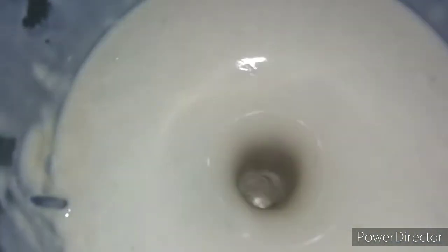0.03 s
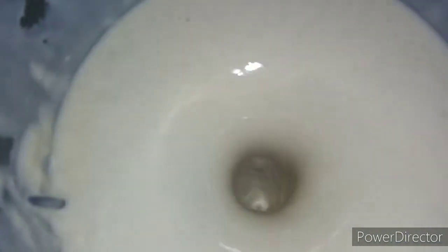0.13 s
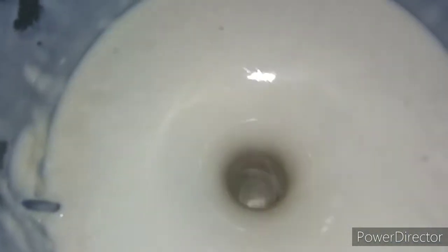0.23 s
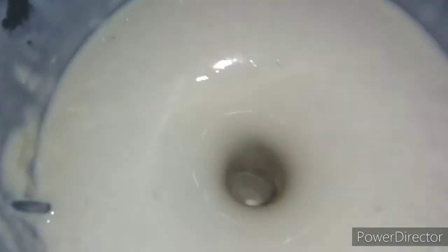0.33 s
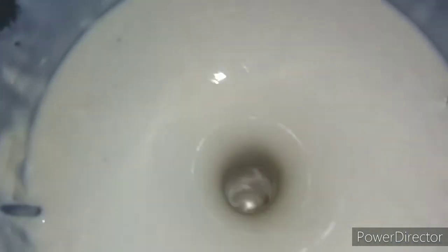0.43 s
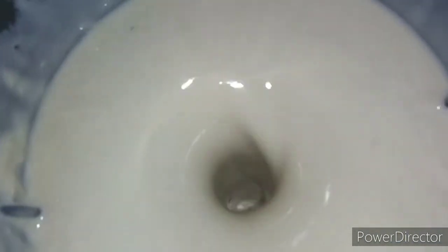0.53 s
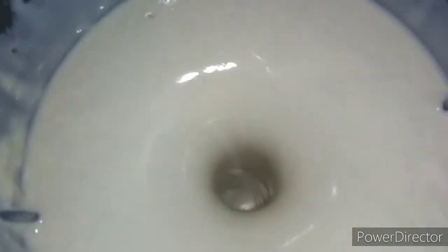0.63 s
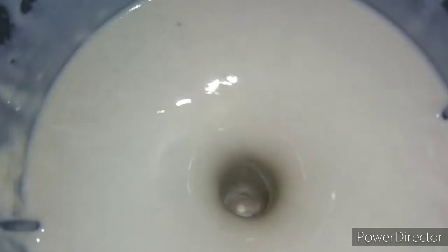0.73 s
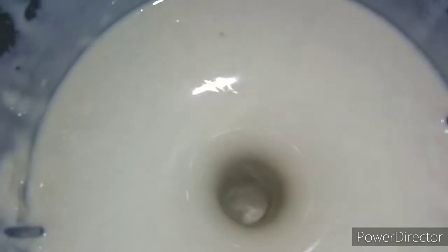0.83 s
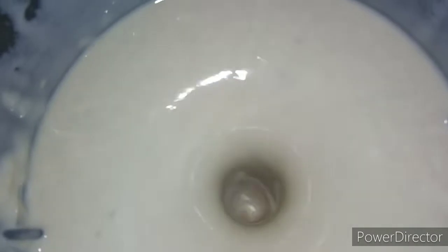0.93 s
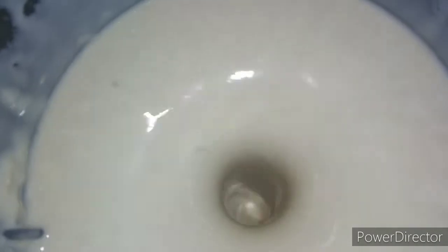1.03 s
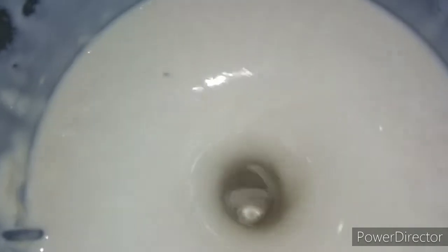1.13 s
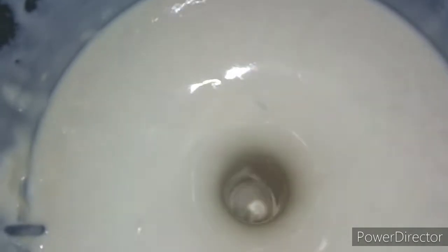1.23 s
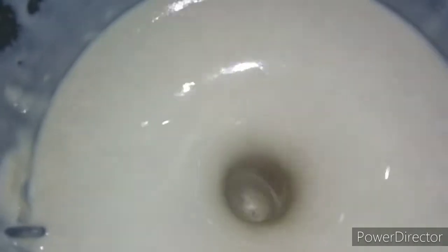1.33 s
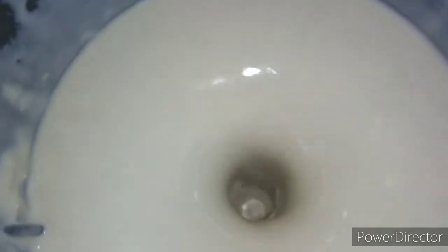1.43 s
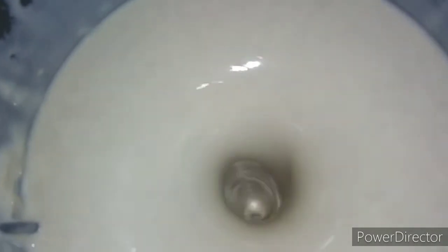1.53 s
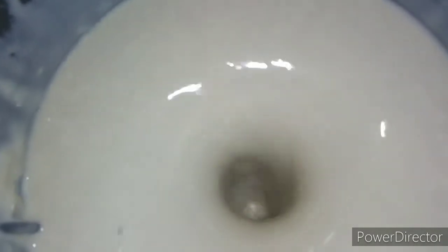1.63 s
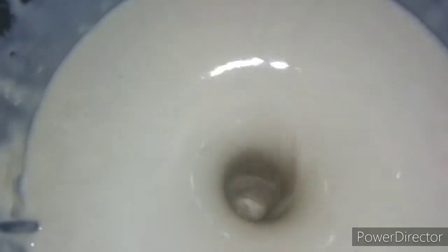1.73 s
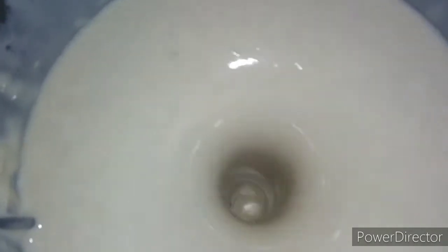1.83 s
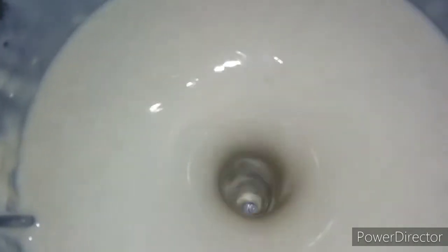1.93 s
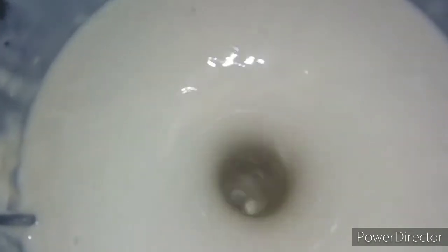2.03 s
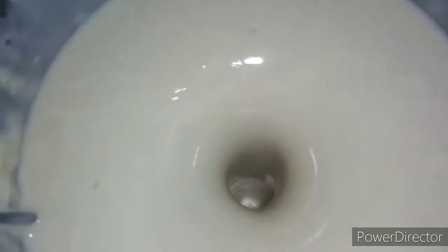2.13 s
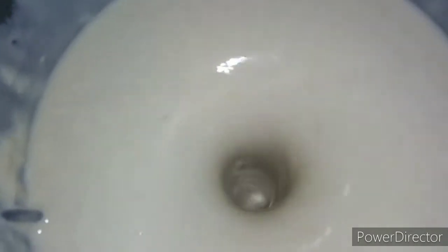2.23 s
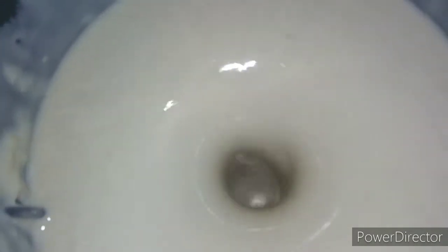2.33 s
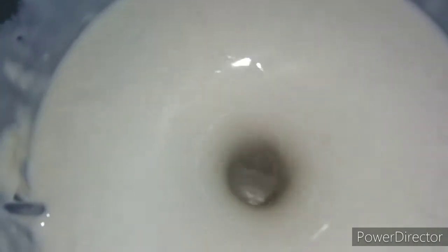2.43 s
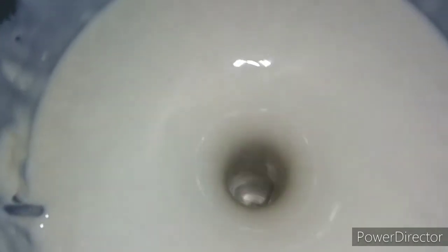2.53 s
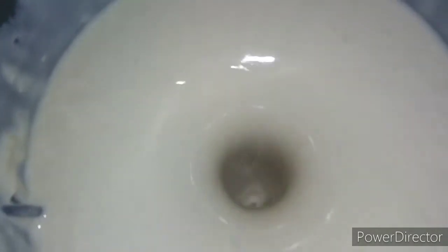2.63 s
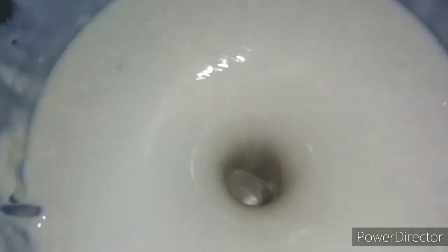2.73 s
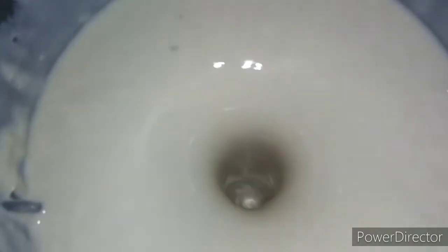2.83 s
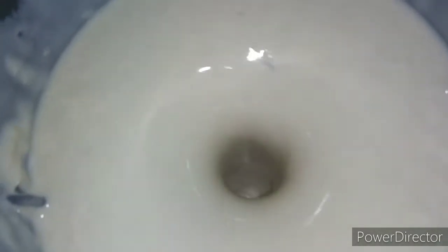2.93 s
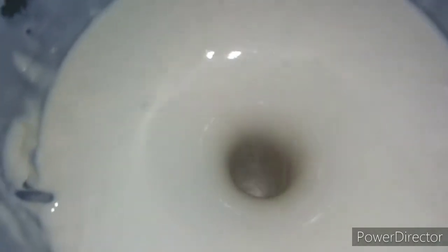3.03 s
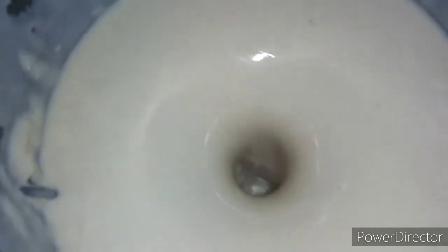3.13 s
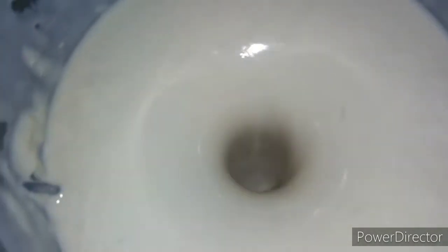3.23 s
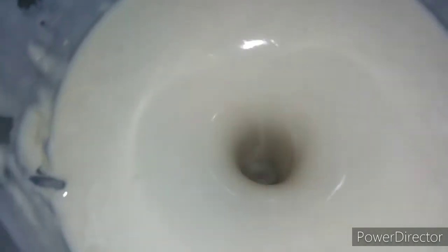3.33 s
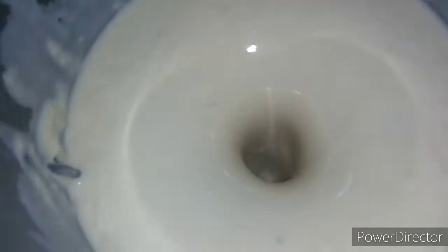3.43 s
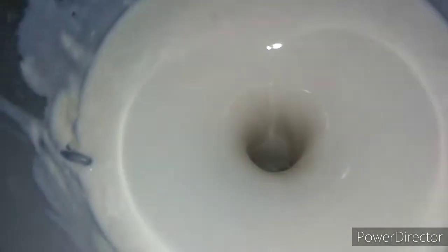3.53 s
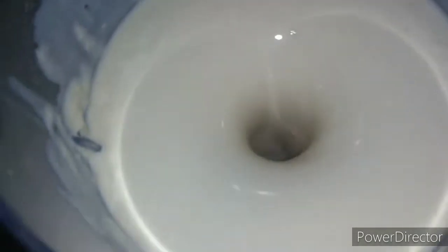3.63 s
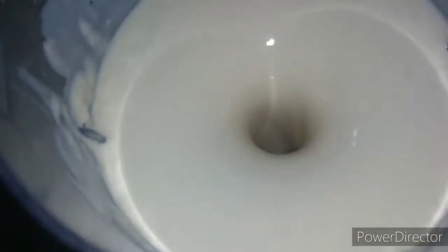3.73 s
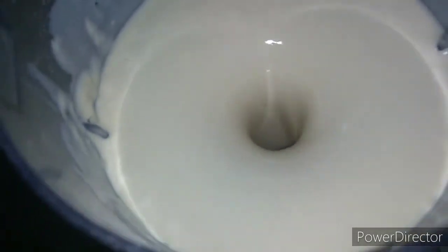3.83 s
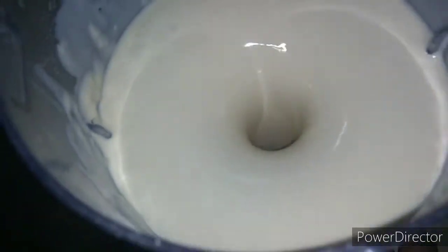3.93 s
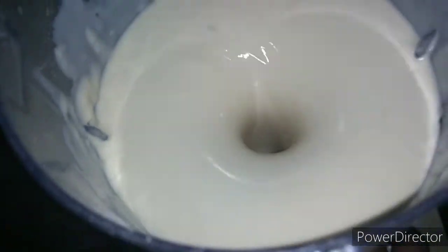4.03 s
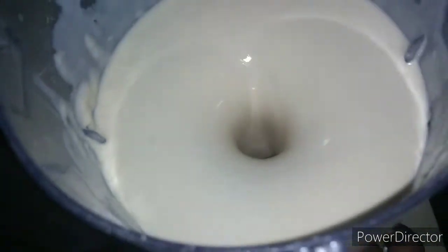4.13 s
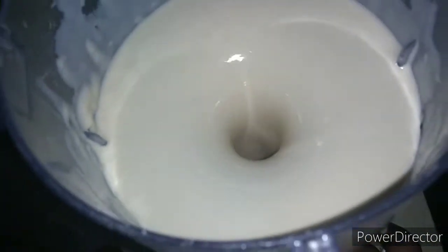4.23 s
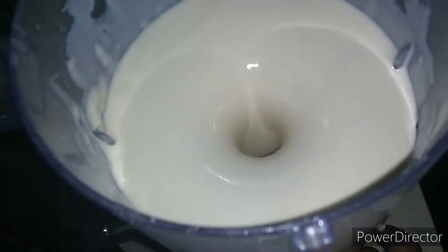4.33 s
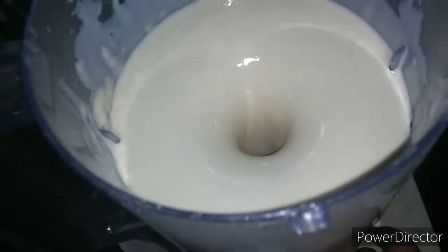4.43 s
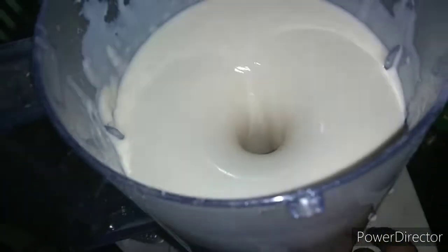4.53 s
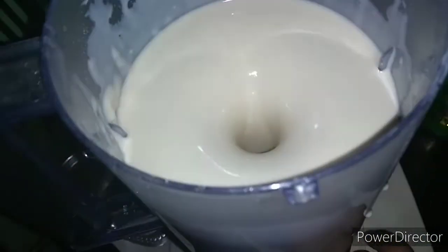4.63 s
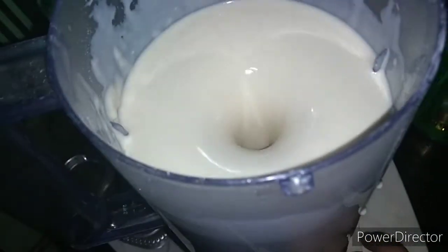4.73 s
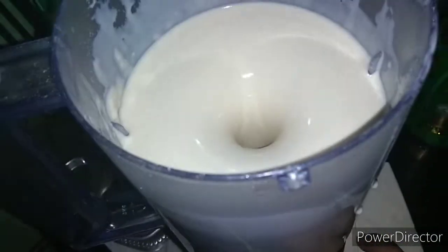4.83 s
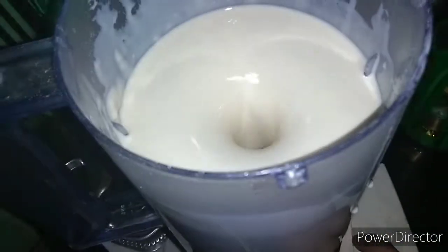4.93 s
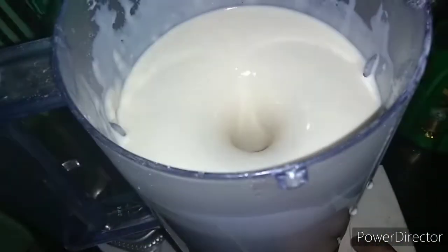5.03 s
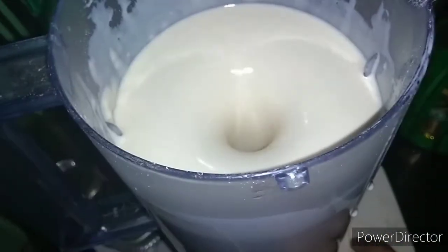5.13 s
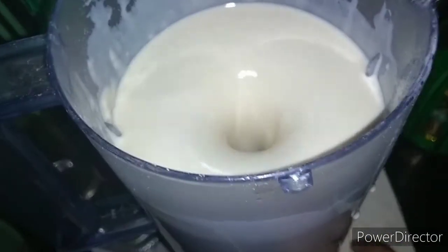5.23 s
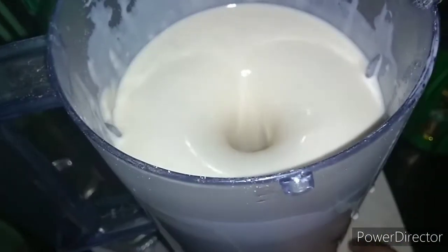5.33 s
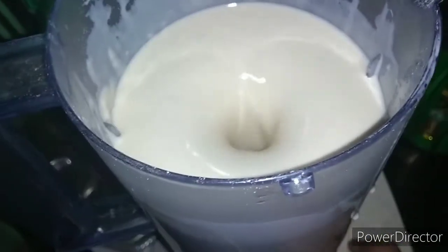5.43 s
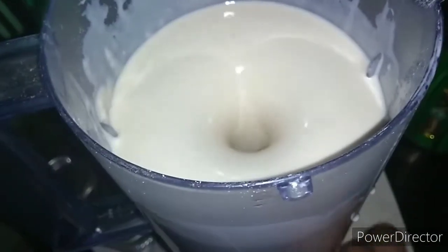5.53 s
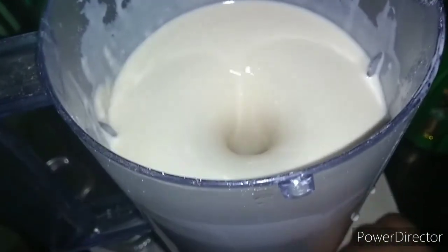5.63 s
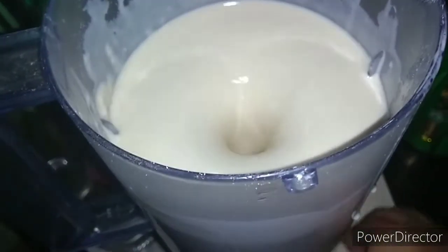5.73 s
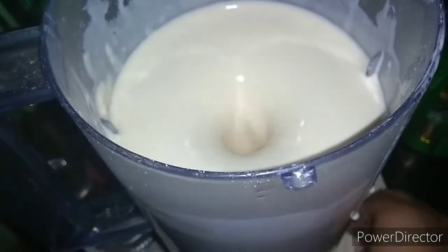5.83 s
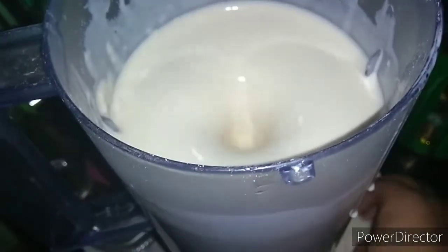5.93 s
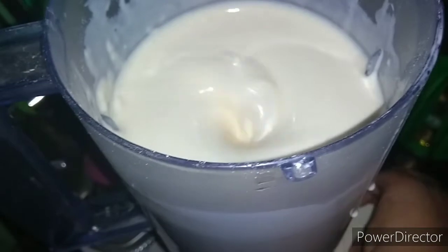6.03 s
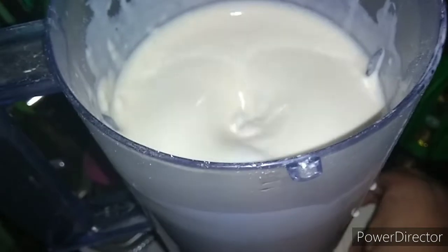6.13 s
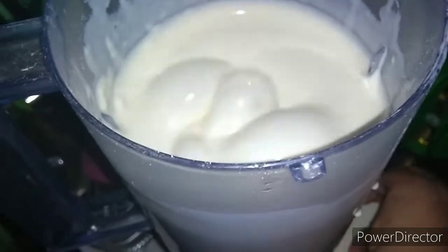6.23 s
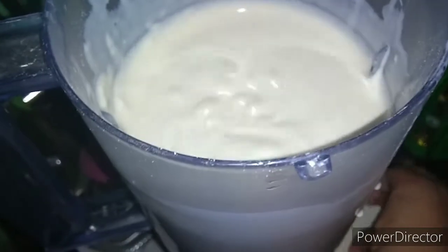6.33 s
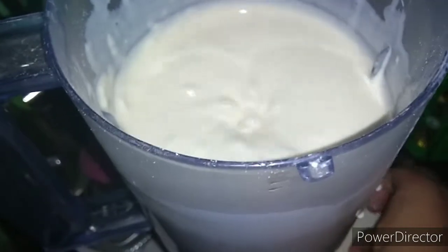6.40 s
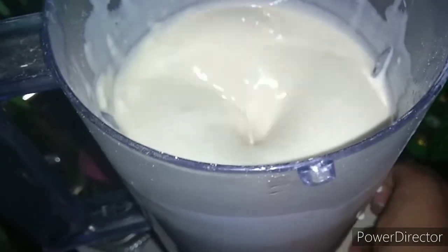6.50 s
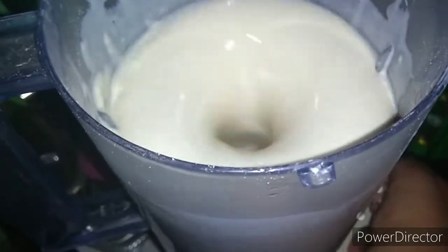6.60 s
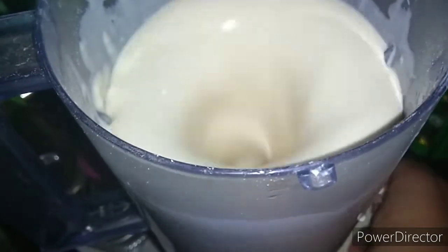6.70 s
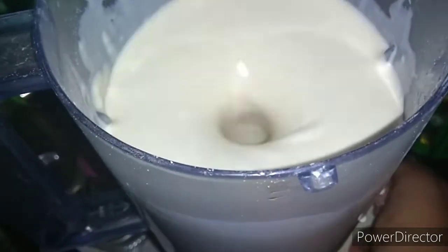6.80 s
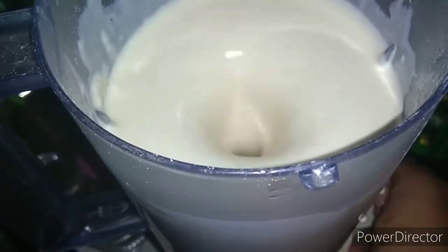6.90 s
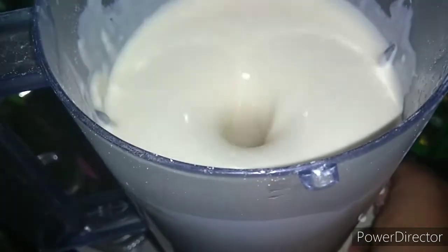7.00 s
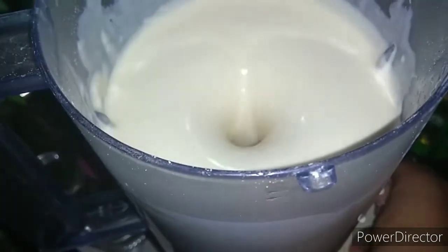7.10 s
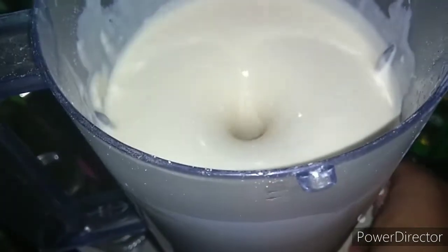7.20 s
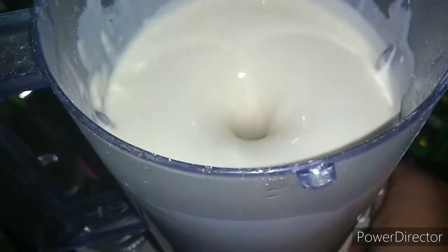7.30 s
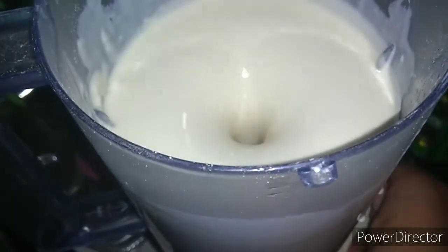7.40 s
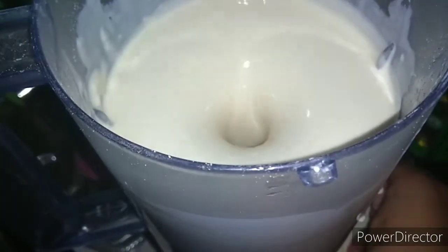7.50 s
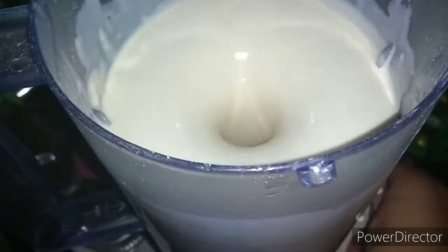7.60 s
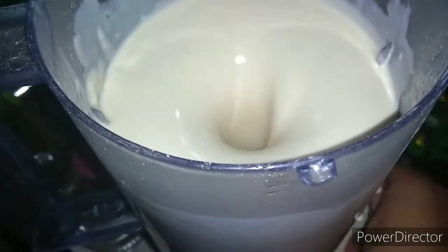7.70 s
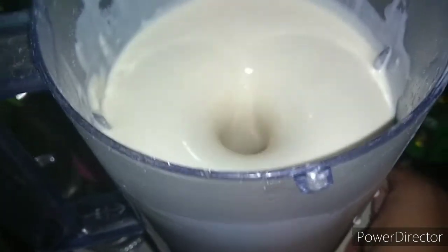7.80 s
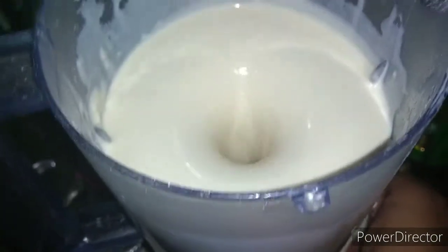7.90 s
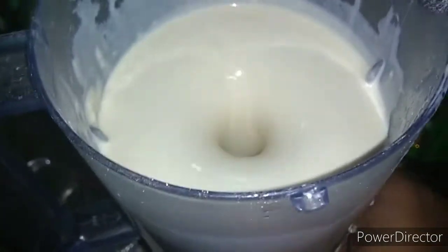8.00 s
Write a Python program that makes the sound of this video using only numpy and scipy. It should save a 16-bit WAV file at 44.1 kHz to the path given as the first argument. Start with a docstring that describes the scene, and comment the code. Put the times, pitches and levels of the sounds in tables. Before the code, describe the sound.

A countertop blender churns liquid batter, heard close above the open jar in a small, dry kitchen. Blades thump unevenly through air pockets, the vortex gulps and crackles, and batter spits over a motor hum. The microphone draws back beside the jar, dulling the crackle and bringing out motor rush. The motor is switched off, slowing with soft plops, then restarts, labouring heavily before the vortex gulps open and steady churning returns.

```python
"""Blades thump through air pockets and ring the open jar of a countertop blender whirling batter, heard close above.
Around them the vortex gulps and crackles, made mostly of random impulses rung through resonances, and spits in
snaps of noise. Sine hums and shaped noise form the motor beneath. The microphone draws back to beside the jar.
The motor is switched off for half a second, then labours in the collapsed batter until the vortex gulps open again."""
import sys
import numpy as np
from scipy import signal
from scipy.fft import rfft, irfft
from scipy.io import wavfile
from scipy.ndimage import uniform_filter1d, map_coordinates

SR = 44100
rng = np.random.default_rng(int(sys.argv[2]) if len(sys.argv) > 2 else 0)


def dump(signal):
    """Clip the signal to [-1, 1] and save it as 16-bit WAV at the path in sys.argv[1]."""
    limited = np.clip(np.atleast_2d(signal).T, -1, 1)
    pcm = np.round(limited * 32767).astype(np.int16)
    wavfile.write(sys.argv[1], SR, pcm)


N = 355357
TIME = np.arange(N) / SR

# Churn at full spin with the blades in full grip: time_s, level_db
CHURN_LEVEL = [(0, -15.5), (1.1, -15.5), (1.7, -13.5), (2.15, -17), (2.7, -15.5), (3.95, -17.5),
               (4.25, -15), (5.6, -15.5), (6.3, -16.5), (6.69, -20.5), (6.74, -27.5), (7.0, -28.5),
               (7.14, -20), (7.35, -20.5), (7.56, -13.5), (8.06, -17)]
# Resonance of the jar, which sags as batter climbs the walls: time_s, ratio to the pitch in JAR_SPECTRUM
JAR_PITCH = [(6.62, 1.054), (6.73, 0.96), (6.8, 1), (7.15, 1), (7.33, .94), (7.5, 1), (7.67, 1.002),
             (8.06, 1.053)]
# Ring of the jar: frequency_hz, relative_db
JAR_SPECTRUM = [(100, -66), (450, -33), (620, -13), (690, -9.5), (740, 0), (780, 4), (850, -2.5), (940, -2),
                (1030, -9.5), (1110, -11.5), (1175, -20.5), (1400, -35), (2500, -46), (6000, -73.5)]
# Soft plops as the vortex closes over: start_s, relative_peak_db
PLOPS = [(5.783, -30), (5.835, -35), (5.88, -39), (5.96, -34), (6.007, -32.5), (6.033, -39), (6.078, -44)]


def churn(drift_s=0.001583, surge_db=0.88, coast_surge_db=0.5, gap_share=0.28, gap_s=0.014):
    """Blades slap air pockets: a dense, uneven patter and soft plops ring the jar."""
    patter = pops(per_s=2200, spread_db=0.5) * from_db(wander(rate_hz=90))
    body = unit(through(patter, ring(JAR_SPECTRUM)))

    # the vortex swells and narrows: reading the sound faster or slower bends the jar's pitch
    place = np.cumsum(curve(JAR_PITCH)) + drift_s * wander(rate_hz=3.88) * SR
    body = np.array([map_coordinates(side, [place], order=3, mode="mirror") for side in body])

    # the patter thins while one large pocket passes the blades
    large = np.bincount([round(s * SR) for s, db, hz in THUMPS], minlength=N)
    passing = np.minimum(signal.oaconvolve(large, np.hanning(round(2 * gap_s * SR)), "same"), 1)
    body = body * (1 - gap_share * passing)

    # slow blades leave the batter to slop unevenly
    surge = (surge_db + coast_surge_db * (1 - spin())) * wander(rate_hz=21)
    level = from_db(curve(CHURN_LEVEL) + surge) * drive(spin_power=3.53, slip_share=0.84)
    plops = from_db(1.5) * blows(PLOPS, ring(JAR_SPECTRUM))
    return body * level + plops


# Hardest thumps of the blades: start_s, relative_peak_db, pocket_pitch_hz
THUMPS = [(0.038, -4.5, 810), (0.068, -8, 900), (0.188, -9.5, 820), (0.221, -5, 770), (0.289, -4, 810),
          (0.395, -4, 736), (0.554, -5.5, 915), (0.618, -4, 777), (0.648, -3.5, 796), (0.799, -2.5, 836),
          (0.833, -1, 795), (0.945, -7, 730), (1.044, -8.5, 820), (1.171, -7, 964), (1.23, -4.5, 895),
          (1.335, -3, 850), (1.371, -5.5, 794), (1.565, -5, 833), (1.755, -7.5, 1037), (1.866, -2.5, 890),
          (2.334, -6.5, 820), (2.456, -4.5, 790), (2.501, 0.5, 787), (2.573, -3, 788), (2.602, -8, 790),
          (2.791, -5, 1056), (2.827, -7, 785), (2.888, -4.5, 834), (2.995, -4, 890), (3.155, -8.5, 960),
          (3.571, -5.5, 797), (3.682, -3, 770), (3.746, -7, 746), (3.755, -3.5, 790), (4.038, -6, 830),
          (4.225, -6, 790), (4.49, -4, 740), (4.819, -1, 800), (4.884, -6.5, 840), (4.931, -7.5, 860),
          (4.977, -6.5, 874), (5.002, -4, 851), (5.048, -3, 947), (5.225, -6.5, 870), (5.348, -4, 867),
          (5.516, -6, 800), (5.581, -3, 784), (5.626, -10.5, 764), (5.659, -8, 790), (6.294, -10, 759),
          (6.357, -5.5, 777), (6.451, -11, 795), (6.511, -4.5, 765), (7.17, -7, 780), (7.478, -8, 834),
          (7.614, -4, 794), (7.66, -6.5, 776), (7.915, -8, 784)]


def thumps(swell_s=0.0024, level_db=-0.5):
    """Each large air pocket hit by a blade swells within a cycle or two and dies away."""
    t = TIME[:1024]
    out = np.zeros((2, N))
    for s, db, hz in THUMPS:
        envelope = t / swell_s * np.exp(1 - t / swell_s)
        pocket = envelope * np.sin(2 * np.pi * hz * t)
        start = round(s * SR)
        out[:, start:start + len(t)] += from_db(db + level_db) * rng.choice([-1, 1], (2, 1)) * pocket
    return out


# Air cavity of the vortex, which leaps as it reaches the blades, then settles:
# time_s, resonance_hz, level_db (at full spin and grip)
VORTEX = [(0, 930, -25.5), (1.7, 924, -27.5), (2.4, 880, -31.5), (3.1, 980, -21.5), (4.0, 970, -38.5),
          (5.2, 1000, -22.5), (5.65, 1020, -30), (6.3, 703, -40), (6.74, 616, -25), (6.82, 1250, -26.5),
          (6.89, 874, -22.5), (6.97, 1130, -29), (7.07, 917, -24), (7.3, 715, -28), (7.52, 850, -30.5),
          (7.66, 824, -21), (7.85, 984, -27), (8.06, 1000, -22)]


def vortex(width_hz=350, rough_db=1.6, bass_hz=450):
    """Rough turbulence sounds the open cavity of the vortex as one broad, moving resonance."""
    lumps = pops(per_s=1200, spread_db=0.5) * from_db(rough_db * wander(rate_hz=34))
    # shift the moving resonance down to 0 Hz, filter there, and shift it back
    turn = np.exp(2j * np.pi * np.cumsum(curve(VORTEX)) / SR)
    pole = np.exp(-np.pi * width_hz / SR)
    cavity = (turn * signal.lfilter([1], np.poly([pole, pole]), lumps / turn)).real
    cavity = signal.sosfilt(signal.butter(2, bass_hz, "highpass", fs=SR, output="sos"), cavity)
    return unit(cavity) * from_db(curve(VORTEX, axis=2)) * drive(spin_power=3.0, slip_share=0.44)


# Gulps of the vortex: middle_s, length_s, resonance_hz, level_db (before the bass cut)
GULPS = [(0.405, 0.056, 555, -21.5), (1.535, 0.063, 565, -20), (2.964, 0.06, 606, -20),
         (3.653, 0.079, 557, -23.5), (4.257, 0.05, 810, -16), (6.345, 0.067, 605, -17),
         (6.436, 0.065, 480, -28), (6.575, 0.1, 534, -24.5), (6.691, 0.057, 590, -15.5),
         (6.8, 0.033, 1200, -22.5), (6.832, 0.035, 1460, -21.5), (6.964, 0.044, 1220, -21.5),
         (7.095, 0.051, 383, -29), (7.453, 0.099, 414, -23.5)]


def gulp(width_hz=360, bass_hz=320):
    """Each gulp swells and fades as turbulence sounds the air cavity of the vortex."""
    lumps = pops(per_s=1600, spread_db=1.0)
    flow = 0
    for s, length, hz, db in GULPS:
        pole = np.exp((2j * np.pi * hz - np.pi * width_hz) / SR)
        shape = swell(s, length)
        puff = signal.lfilter([1], np.poly([pole, pole]), lumps).real * shape
        # even out the loudness of the puffs before setting each level
        even = np.linalg.norm(shape) / np.linalg.norm(puff, axis=1, keepdims=True)
        flow = flow + from_db(db) * puff * even
    # a small cavity radiates little bass
    return signal.sosfilt(signal.butter(2, bass_hz, "highpass", fs=SR, output="sos"), flow)


# Rumble of the batter: frequency_hz, relative_db
SLOSH_SPECTRUM = [(30, -86), (60, -35), (95, -19), (122, -7.5), (140, -5.5), (180, -10.5), (245, -6),
                  (330, -9.5), (370, -4), (410, -12.5), (475, -12), (500, -2.5), (530, -4.5), (600, -1),
                  (750, -2), (1200, -36), (4000, -63)]


def slosh(level_db=-24.0, surge_db=1.2):
    """The mass of batter rumbles against the walls, the more the heavier the load."""
    level = from_db(level_db + surge_db * wander(rate_hz=13))
    level = level * drive(spin_power=3.3, load_share=0.75, slip_share=0.76, beside_db=-3.0)
    return unit(through(pops(per_s=1500, spread_db=1.0), ring(SLOSH_SPECTRUM))) * level


# Wet slaps of batter on the wall: start_s, relative_level_db
SLAPS = [(0.753, -11), (1.287, -12), (1.373, -14), (2.361, -14.5), (2.881, -15), (3.398, -17),
         (3.743, -12.5), (4.312, -19), (4.731, -13)]
# Colour of a slap: frequency_hz, relative_db
SLAP_SPECTRUM = [(500, -36), (1300, -6), (1800, 1.5), (2350, 5), (2900, -15.5), (6000, -45)]


def slaps(length_s=0.004, level_db=-2.0):
    """Batter flung against the wall lands with a short wet smack of noise."""
    t = TIME[:1024]
    smack = rng.standard_normal(len(t)) * t * np.exp(-t / length_s)
    return from_db(level_db) * blows(SLAPS, np.convolve(ring(SLAP_SPECTRUM), smack))


# Modes of the air above the batter: frequency_hz, width_hz, relative_db
MOUTH_MODES = [(2446, 16.4, 18.5), (3193, 187, 12.5), (3376, 120, 9.5), (3900, 120, 3), (4680, 160, 3),
               (5820, 200, -5), (7010, 580, -7.5), (7980, 480, -12)]
# Larger bubbles bursting in the throat of the vortex: start_s, relative_peak_db
BURSTS = [(0.0835, -17), (0.092, -20), (.8066, -22.5), (1.133, -23), (1.2136, -22.5), (1.6824, -14),
          (1.8145, -12.5), (1.9975, -17), (2.3688, -13), (2.517, -20), (2.655, -16), (3.475, -19),
          (3.6612, -20.5), (3.7454, -14.5)]


def crackle(soft_hz=8000, level_db=-28.5, burst_s=0.0023, pings_db=-8.0):
    """Clumps of small bubbles and a few large ones burst and ring the mouth of the jar."""
    t = TIME[:1024]
    modes = 0
    for hz, width, db in MOUTH_MODES:
        modes = modes + from_db(db) * width * np.exp(-np.pi * width * t) * np.sin(2 * np.pi * hz * t)
    modes = signal.sosfilt(signal.butter(6, soft_hz, fs=SR, output="sos"), modes)
    clumps = from_db(4.33 * np.tanh(wander(rate_hz=19.3)))
    mouth = unit(through(pops(per_s=1300, spread_db=1.0) * clumps, modes))

    # the bubbles also ping at pitches of their own
    pings = bubbles(ring_s=0.0012, spread_db=4.0, low_hz=2900, high_hz=4470, count=5000)
    pings = unit(pings * clumps)

    # a large bubble tears open over a few milliseconds
    tear = rng.standard_normal(len(t)) * t * np.exp(-2 * t / burst_s)
    tear = signal.sosfilt(signal.butter(4, 4200, fs=SR, output="sos"), tear)
    bursts = from_db(7.5) * blows(BURSTS, np.convolve(modes, tear))

    # the small bubbles are loudest straight above the jar
    level = from_db(level_db) * drive(spin_power=2.1, load_share=0.88, slip_share=0.66, beside_db=-12.0)
    return (mouth + from_db(pings_db) * pings) * level + bursts


# Fizzing spurts of air: middle_s, relative_peak_db, length_s
SPURTS = [(0.22, -41, 0.095), (0.722, -47, 0.087), (0.891, -40, 0.043), (1.427, -41, 0.061),
          (1.55, -37.5, 0.072), (1.647, -41.5, 0.094), (1.845, -34.5, 0.088), (2.073, -34, 0.054),
          (2.685, -36.5, 0.085), (3.276, -38.5, 0.031), (3.74, -40.5, .06), (3.91, -45, 0.077),
          (4.25, -37.5, 0.059), (5.46, -41.5, 0.15), (6.55, -45, 0.6), (6.702, -38, 0.028),
          (7.697, -34, 0.046)]
# Sharp spits and drips of batter, and a faint tick of the switch at 6.04 s: peak_time_s, relative_peak_db
SPITS = [(0.085, -35.5), (0.427, -32.5), (0.6872, -39), (0.793, -46.5), (0.877, -43), (1.571, -36),
         (1.664, -33.5), (1.826, -41), (1.834, -44), (1.859, -37), (1.939, -38), (2.054, -43), (2.075, -38),
         (2.124, -40), (2.336, -35), (2.368, -32.5), (2.6556, -46), (3.259, -40), (3.298, -31.5),
         (3.306, -39), (3.69, -36), (3.725, -40), (3.737, -41), (3.759, -40.5), (3.918, -41), (4.266, -38),
         (5.49, -42), (6.04, -62), (6.684, -30.5), (7.68, -36.5), (7.705, -45)]
# Colour of the spray: frequency_hz, relative_db
FIZZ_SPECTRUM = [(1200, -47.5), (3200, 22), (4500, 15.5), (7000, 11.5), (9000, 3), (12500, -10.5),
                 (14500, -6.5)]


def spray(spit_rise_s=0.0007, spit_decay_s=0.0022):
    """Torn air spatters in spurts of bubbles; spits and a switch tick snap as noise, now duller, now brighter."""
    spurts = sum(from_db(db) * swell(s, length) for s, db, length in SPURTS)
    flicker = from_db(1.2 * wander(rate_hz=75))
    fizz = unit(through(bubbles() * flicker, ring(FIZZ_SPECTRUM)))

    snaps = np.zeros(N)
    for s, db in SPITS:
        slope_s = np.where(TIME < s, spit_rise_s, spit_decay_s)
        snaps += from_db(db) * np.exp(-abs(TIME - s) / slope_s)
    hiss = unit(through(rng.standard_normal((2, N)), ring(FIZZ_SPECTRUM)))

    sound = from_db(6.5) * spurts * fizz + from_db(12.5) * snaps * hiss
    top = signal.sosfiltfilt(signal.butter(2, 8000, "highpass", fs=SR, output="sos"), sound)
    return sound + top * (from_db(0.5 + 2 * wander(rate_hz=16)) - 1)


def motor():
    """One turning shaft carries the hum and flutters the rush, over the buzz of the windings."""
    speed = curve(SHAFT_SPEED) * spin() * (1 + 0.002 * wander(rate_hz=4))
    angle = 2 * np.pi * np.cumsum(speed) / SR
    return shaft_hum(angle) + rush(angle) + windings()


# Hum of the shaft at full spin and grip: time_s, level_db
HUM_LEVEL = [(0, -36.5), (2.9, -35), (3.3, -39.5), (4.2, -34.5), (5.6, -31), (6.35, -38), (6.72, -33),
             (6.9, -40), (7.2, -36.5), (7.5, -29.5), (8.06, -35)]


def shaft_hum(angle):
    """Unbalance hums once a turn; batter drags unevenly on the blades and adds wavering overtones."""
    waver_db = 0.6 * wander(rate_hz=5)
    overtones = (1 + 0.5 * wander(rate_hz=6)) * (0.6 * np.sin(2 * angle) + np.sin(3 * angle))
    tone = np.sin(angle) + from_db(-19 + 2.2 * curve(LOAD)) * overtones
    level = from_db(curve(HUM_LEVEL) + waver_db) * drive(spin_power=4.5, slip_share=0.9)
    return np.sqrt(2) * tone * level


# Roar of the motor: frequency_hz, relative_db
ROAR_SPECTRUM = [(200, -51.5), (900, -8), (1170, -3), (1240, 4.5), (1400, 1.5), (1600, 0.5), (1850, -1.5),
                 (2100, -0.5), (2370, 4), (2700, -6), (3300, -14.5), (6000, -58)]
# Rush of the cooling air: frequency_hz, relative_db
AIR_SPECTRUM = [(1000, -40), (2900, -2), (3300, 0.5), (3750, -5), (4700, -2), (5300, -5), (6300, -10.5),
                (7200, -14.5), (7600, -17.5), (8100, -20), (8800, -25.5), (9500, -25), (10300, -33),
                (14200, -36.5)]


def rush(angle, roar_db=-29, air_db=-39.0):
    """Roar from rough impulses and cooling air from noise flutter once a turn with the shaft."""
    flutter = from_db(0.9 * np.sin(angle) + wander(rate_hz=25.3))
    grit = pops(per_s=2500, spread_db=1.0) * from_db(wander(rate_hz=41))
    roar = unit(through(grit, ring(ROAR_SPECTRUM))) * from_db(roar_db)
    roar = roar * drive(spin_power=2.38, load_share=0.36, slip_share=1.0, beside_db=2.5)
    air = unit(through(rng.standard_normal((2, N)), ring(AIR_SPECTRUM))) * from_db(air_db)
    air = air * drive(spin_power=2.66, load_share=0.14, slip_share=0.9, beside_db=8.0)
    return flutter * (roar + air)


def windings(hum_hz=120, level_db=-48.5):
    """The powered windings buzz at twice the mains rate, with a wavering third harmonic."""
    # a short average softens the switching
    powered = uniform_filter1d(1.0 * ((TIME < OFF_S) | (TIME > ON_S)), size=400)
    mains = 2 * np.pi * hum_hz * TIME
    buzz = np.sin(mains) + from_db(-11.0) * wander(rate_hz=12) * np.sin(3 * mains)
    return np.sqrt(2) * buzz * from_db(level_db + 1.24 * curve(LOAD)) * powered


# Shaft speed under power, before the switch acts: time_s, turns_per_s
SHAFT_SPEED = [(0, 151), (0.6, 150.2), (5.6, 150), (6.3, 136), (6.44, 128), (6.64, 130), (6.84, 138),
               (6.94, 160), (7.08, 160), (7.25, 150), (7.5, 146), (7.9, 149.5)]


def whine(order=3.32, level_db=-46.5, waver_db=3.5, jitter_share=0.01606):
    """A rough tone, at no whole multiple of the shaft speed, sags and recovers with it."""
    hz = order * curve(SHAFT_SPEED) * spin() * (1 + jitter_share * wander(rate_hz=25.2))
    level = from_db(level_db + waver_db * wander(rate_hz=10))
    level = level * drive(spin_power=2.9, load_share=0.54, slip_share=0.6)
    return np.sqrt(2) * np.sin(2 * np.pi * np.cumsum(hz) / SR) * level


# The switch goes off and on again; drag halves the speed in COAST_S and friction would stop
# the shaft after STOP_S; the motor pulls it back up with the time constant SPIN_UP_S
OFF_S, ON_S = 5.645, 6.135
COAST_S, STOP_S, SPIN_UP_S = 0.13, 0.57, 0.095


def spin():
    """Share of the powered speed: the blades coast against drag and friction, then spin up."""
    off = np.clip(TIME, OFF_S, ON_S) - OFF_S
    coast = np.clip(1 - (off / STOP_S) ** 6, 0.05, 1) / (1 + off / COAST_S)
    return 1 - (1 - coast) * np.exp(-np.maximum(TIME - ON_S, 0) / SPIN_UP_S)


# Load of batter on the blades, heavy in the collapsed vortex, light as it reopens:
# time_s, db_over_usual_load (each layer takes its own share)
LOAD = [(0, 0), (1.6, 0.5), (2.2, -2), (3.7, 0), (5.0, 1), (5.65, 0.5), (6.3, 12.5), (6.7, 7), (6.74, -4),
        (6.93, -9.5), (7.15, -4.5), (7.43, 2.5), (7.85, 2.5), (8.06, 0.5)]
# The blades slip in a pocket of air and the batter quietens (a negative depth lifts it):
# middle_s, length_s, depth_db (each layer takes its own share)
SLIPS = [(0.555, 0.17, 4.5), (0.93, 0.43, 3), (1.92, 0.095, 4), (3.081, 0.18, 8.5), (3.352, 0.08, 5),
         (3.89, 0.29, 2.5), (4.367, 0.085, 2.5), (4.63, 0.097, -1), (4.998, 0.17, 3.5), (6.896, 0.049, 4.5),
         (7.792, 0.39, 4)]
# The microphone draws back from above the vortex to beside the jar
DRAW_START_S, DRAW_END_S = 3, 4.82


def drive(spin_power, load_share=0, slip_share=0, beside_db=0):
    """Gain of a layer: a power of the spin, its shares of load and slips, and its change beside the jar."""
    slip_db = sum(db * swell(s, length) for s, length, db in SLIPS)
    beside = np.interp(TIME, (DRAW_START_S, DRAW_END_S), (0, 1))
    gain_db = load_share * curve(LOAD) - slip_share * slip_db + beside_db * beside
    return spin() ** spin_power * from_db(gain_db)


# Faint rumble of the room: frequency_hz, relative_db
RUMBLE_SPECTRUM = [(25, -15.5), (60, -13.5), (120, 1.5), (220, -6), (400, -11), (2000, -30.5),
                   (14000, -49.5)]


def room_rumble():
    """Low noise wanders slightly in level behind the blender."""
    noise = unit(through(rng.standard_normal((2, N)), ring(RUMBLE_SPECTRUM)))
    return noise * from_db(-47 + 1.3 * wander(rate_hz=6.5))


def kitchen(x, t60=0.038, tail_db=-19, wall_s=0.019, wall_db=-15):
    """One dull wall echo and a short tail of sparse reflections."""
    t = TIME[:SR // 2]
    sparse = rng.choice([-1, 1], len(t)) * (rng.random(len(t)) < 0.05) * (t > 0.005)
    taps = sparse * from_db(-60 * t / t60)
    tail = from_db(tail_db) * taps / np.linalg.norm(taps)
    wall = np.exp(-((t - wall_s) / 0.00041) ** 2)
    echo = from_db(wall_db) * wall / wall.sum()
    return through(x, (t == 0) + tail - echo)


# Likeness of the two microphone ports: frequency_hz, coherence (0 to 1)
LIKENESS = [(30, 0.62), (120, 0.99), (1000, 0.97), (1800, 0.94), (2400, 0.96), (4000, 1), (6000, 0.98),
            (14000, 0.64)]
# How much later sound reaches the right port: frequency_hz, delay_s
LAG = [(150, 0.0005), (400, 0.00047), (800, 0.00045), (1300, 0.00041), (2600, 0.000395), (5300, 0.0003773),
       (10000, 0.000378)]
# Left port over right port: frequency_hz, difference_db
BALANCE = [(60, 0), (300, 1.5), (900, 2.5), (1350, 1.1), (2400, 2), (4700, 4.5), (7000, 2), (10000, 0.5)]


def ports(pair):
    """Two unrelated signals become the two ports: the right is later, weaker and of opposite polarity."""
    hz = np.fft.rfftfreq(N, 1 / SR)
    direct, diffuse = rfft(pair)
    same = np.clip(at_hz(LIKENESS, hz), 0, 1)
    delayed = direct * np.exp(-2j * np.pi * hz * at_hz(LAG, hz))
    right = -same * delayed + np.sqrt(1 - same ** 2) * diffuse
    return np.array([pair[0], irfft(right / from_db(at_hz(BALANCE, hz)), N)])


def bubbles(ring_s=0.00085, spread_db=3.0, low_hz=2800, high_hz=14000, count=26000):
    """Tiny bubbles burst at random, each a brief ping of its own pitch and size."""
    when, pitch, size = rng.random((count, 3)).T[:, :, None]
    t = TIME[:160]
    hz = low_hz + (high_hz - low_hz) * pitch
    gain = from_db(spread_db * np.minimum(-np.log(size), 3))
    pings = gain * np.exp(-t / ring_s) * np.sin(2 * np.pi * hz * t)
    # scatter over both channels laid end to end
    at = (when * (2 * N - len(t))).astype(int) + np.arange(len(t))
    return np.bincount(at.ravel(), pings.ravel(), 2 * N).reshape(2, N)


def pops(per_s, spread_db):
    """Two trains of random impulses, mostly small and a few large."""
    size = from_db(spread_db * np.minimum(rng.exponential(1, (2, N)), 3))
    return unit(size * rng.choice([-1, 1], (2, N)) * (rng.random((2, N)) < per_s / SR))


def blows(rows, response):
    """One ring of the response for each row (start_s, peak_db)."""
    train = np.zeros((2, N))
    for s, db in rows:
        train[:, round(s * SR)] = from_db(db) * rng.choice([-1, 1], 2)
    return through(train, response / abs(response).max())


def ring(spectrum, size=4096):
    """Causal impulse response with the given spectrum."""
    log_gain = np.log(from_db(at_hz(spectrum, abs(np.fft.fftfreq(size, 1 / SR)))))
    # the Hilbert transform of the log gain gives the minimum phase
    return np.fft.ifft(np.exp(np.conj(signal.hilbert(log_gain)))).real[:size // 2]


def through(x, response):
    """Convolves each channel with a response."""
    return signal.oaconvolve(x, response[None], axes=1)[:, :N]


def swell(s, length):
    """A smooth rise and fall around the time s."""
    return np.exp(-np.minimum((2 * (TIME - s) / length) ** 2, 50))


def wander(rate_hz):
    """Slow random motion of rms 1, up to about the given rate."""
    hz = np.fft.rfftfreq(N, 1 / SR)
    return unit(irfft(rfft(rng.standard_normal(N)) / (1 + (hz / rate_hz) ** 4), N))


def curve(rows, axis=1):
    """One column of a table, joined by straight lines in time."""
    rows = np.array(rows)
    return np.interp(TIME, rows[:, 0], rows[:, axis])


def at_hz(points, hz):
    """Reads a spectrum on a log-frequency axis."""
    f, value = np.transpose(points)
    return np.interp(np.log(hz + 1), np.log(f), value)


def from_db(db):
    """Decibels to gain."""
    return 10 ** (np.asarray(db) / 20)


def unit(x):
    """Scales to an rms of 1."""
    return x / np.sqrt(np.mean(x ** 2) + 1e-20)


def scene():
    """All parts of the blender in the kitchen, over the room's rumble, at the two ports."""
    batter = churn() + thumps() + vortex() + gulp() + slosh() + slaps() + crackle() + spray()
    blender = batter + motor() + whine()
    return ports(kitchen(blender) + room_rumble())


def record(dry, bass_cut_hz=62, edge_hz=14500):
    """The microphone drops the deepest bass and rounds off the highest peaks; then the band limit."""
    x = signal.sosfilt(signal.butter(2, bass_cut_hz, "highpass", fs=SR, output="sos"), dry)
    x = x / (1 + (abs(x) / 0.95) ** 8) ** (1 / 8)
    band = signal.firwin(511, edge_hz, window=("kaiser", 9), fs=SR)
    return signal.oaconvolve(x, band[None], "same")


dry = scene()
out = record(dry)
dump(out)
```